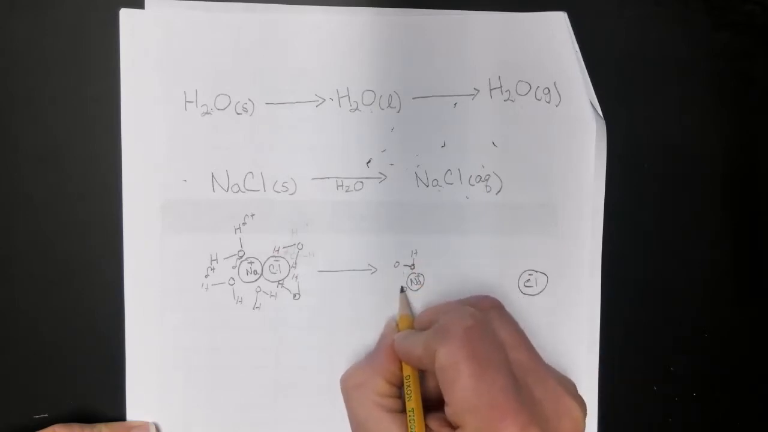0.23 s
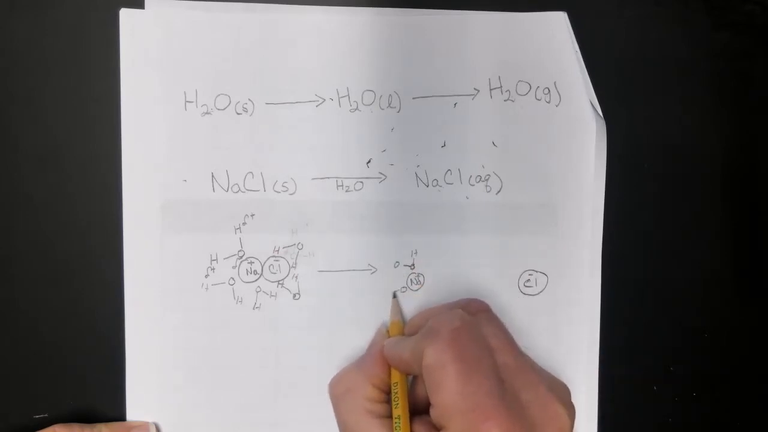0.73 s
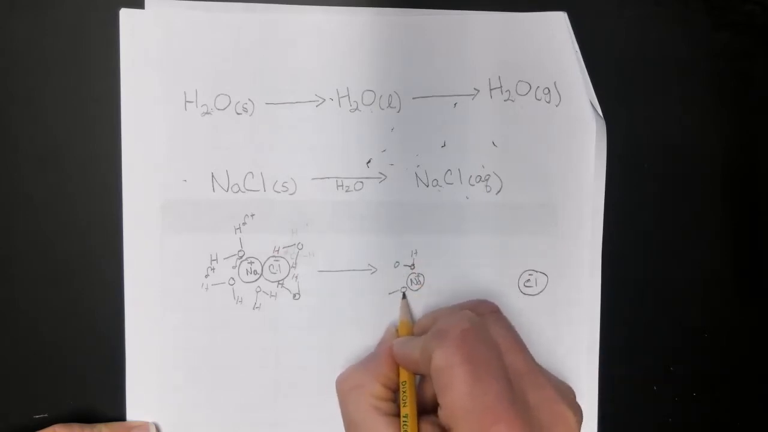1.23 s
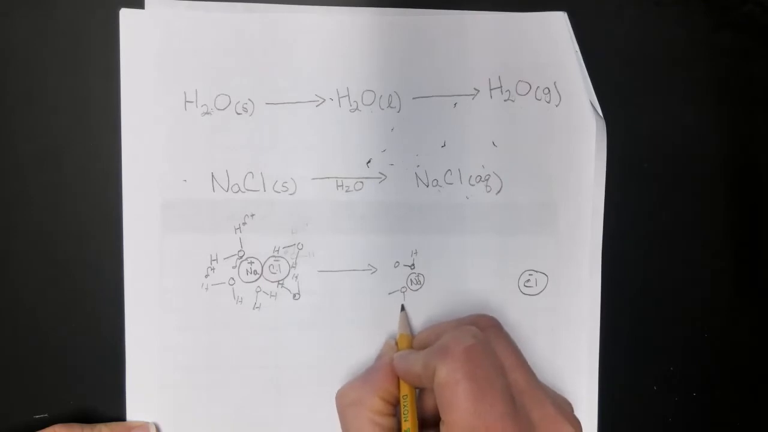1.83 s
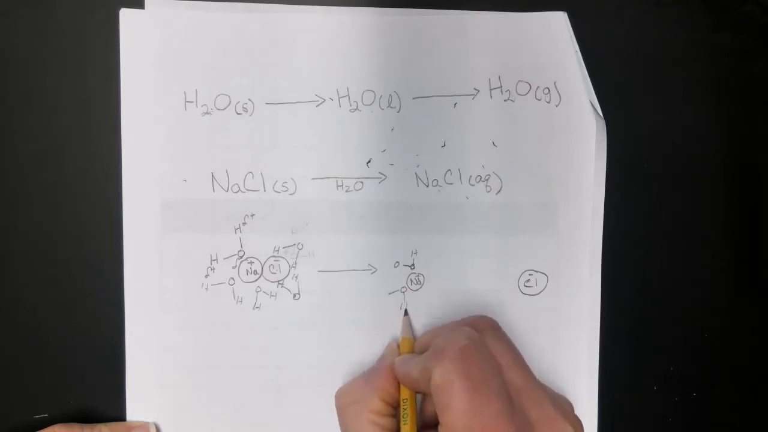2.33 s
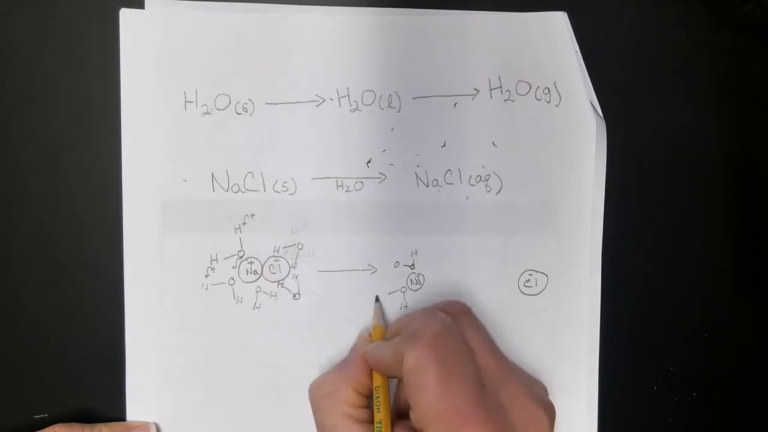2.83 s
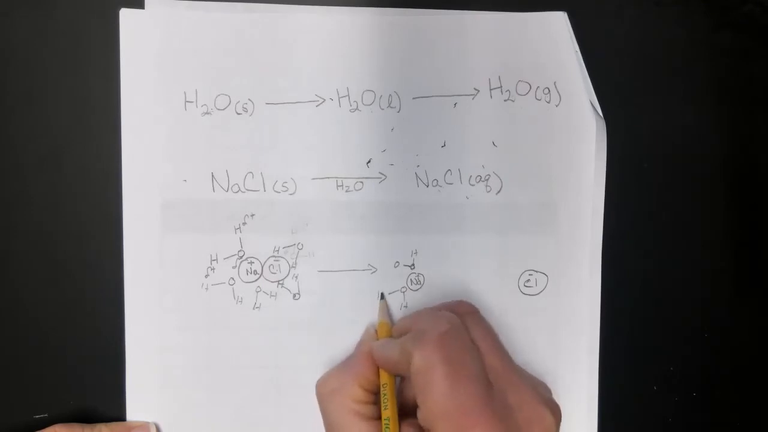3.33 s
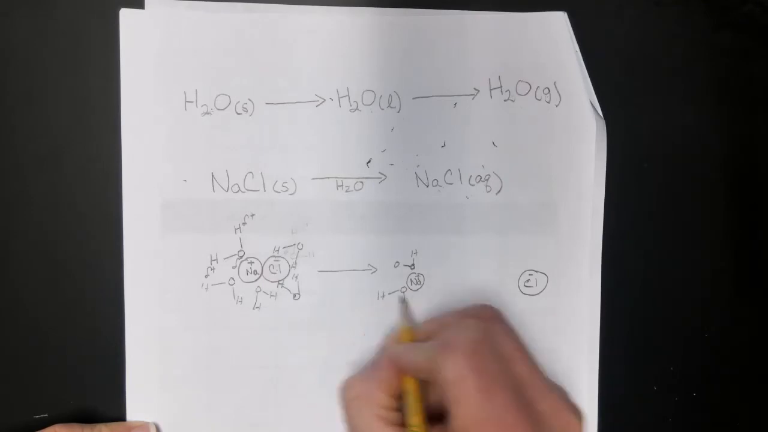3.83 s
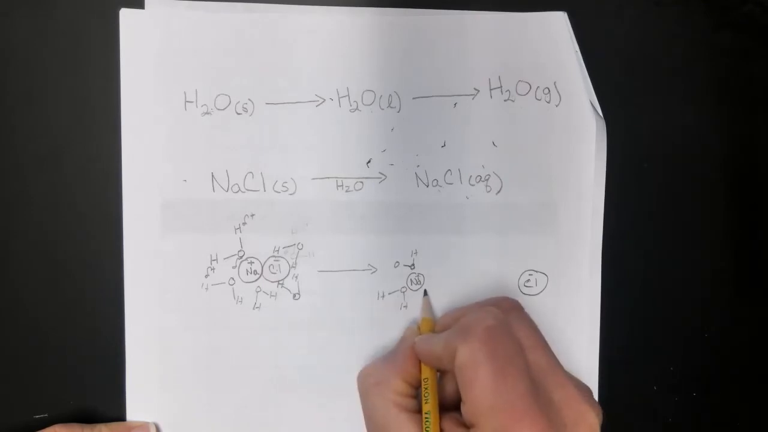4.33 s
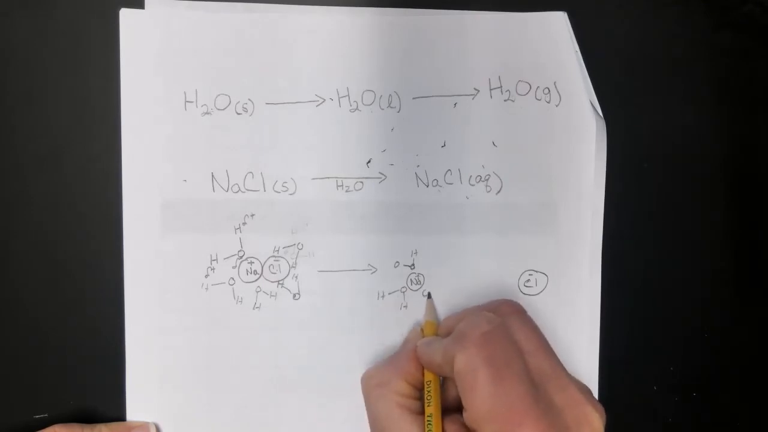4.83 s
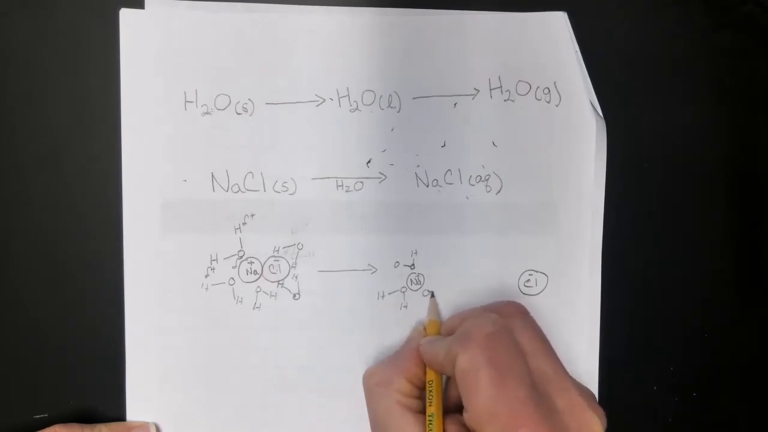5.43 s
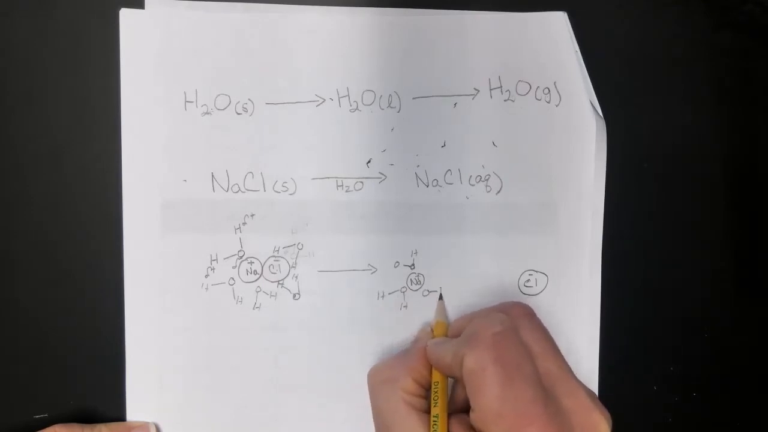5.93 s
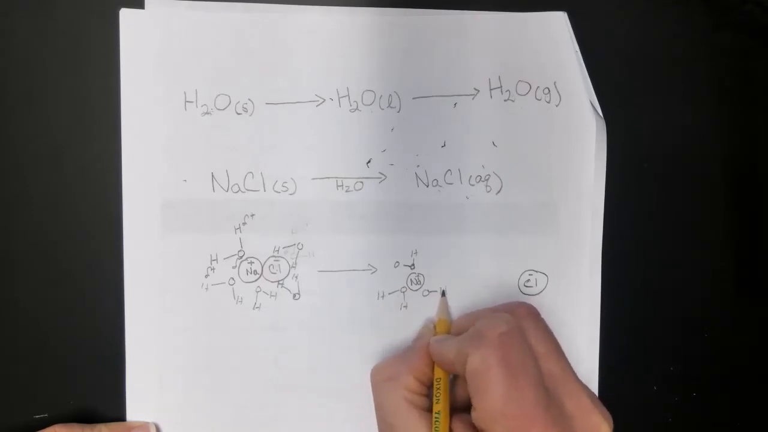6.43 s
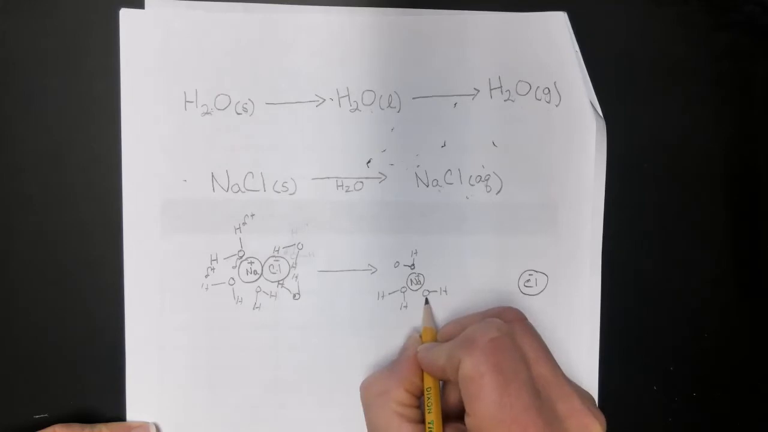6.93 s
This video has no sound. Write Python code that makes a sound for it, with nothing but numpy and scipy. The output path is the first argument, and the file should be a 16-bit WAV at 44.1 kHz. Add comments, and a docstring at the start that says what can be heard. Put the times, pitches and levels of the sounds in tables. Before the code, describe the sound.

Faint, close pencil writing on a sheet of paper, with light taps and soft hand swishes in a quiet, humming room.

```python
"""Pencil on paper, close up

A pencil draws small letters and lines on a sheet lying on a desk, in a quiet room with humming
ventilation. The tip ticks down and catches on paper fibres, which ring the pencil; between letters
the hand slides over the sheet. The desk microphone is narrow-band and adds its own hiss, and the
treble dips briefly now and then."""
import sys
import numpy as np
from scipy import signal
from scipy.fft import rfft, irfft
from scipy.io import wavfile
from scipy.ndimage import uniform_filter1d

SR = 44100
rng = np.random.default_rng(int(sys.argv[2]) if len(sys.argv) > 2 else 0)


def unload_wav(signal):
    """Save mono or channel-first audio to the path in sys.argv[1] as 16-bit WAV at rate SR, clipped to [-1, 1]."""
    wavfile.write(
        sys.argv[1],
        SR,
        np.round(np.clip(np.atleast_2d(signal).T, -1, 1) * 32767).astype(np.int16),
    )


N = 316197
T = np.arange(N) / SR
FREQS = np.maximum(np.fft.rfftfreq(N, 1 / SR), 1)
TOP_HZ = 7270  # upper edge of the microphone's band

# modes of the pencil against the desk: pitch_hz, width_hz, level_db
PENCIL_MODES = [(1380, 470, -4.5), (1920, 330, -2), (2504, 330, 0), (3160, 290, 0.5), (3820, 360, 0.5),
                (4204, 330, 3.5), (5100, 740, -9.5), (5420, 560, 0.5), (6420, 830, 0), (7070, 190, 4.5)]


def pencil_strokes():
    """Fibre slips shake the pencil; some stroke directions ring the tip, others make the shaft rasp."""
    # strokes on the sheet: middle_s, length_s, level_db, ring_db, ring_pitch_hz, rasp_db
    strokes = [(0.037, 0.12, -62.5, -0.5, 5950, -3), (0.197, 0.17, -65.5, -3, 6170, -4.5),
               (0.615, 0.105, -57.7, 0, 6180, 5.5), (0.702, 0.04, -62, 0, 6150, -2),
               (0.792, .074, -68, -9, 6060, -5), (1.155, 0.11, -60.5, 4.5, 6000, -2),
               (1.85, 0.12, -64.5, -1, 6150, -1), (1.94, .04, -72, 3, 6150, -2),
               (2.18, 0.1, -62, 4, 6120, -3.5), (2.426, 0.073, -62, -8, 6100, -2),
               (3.024, 0.12, -61, 5.5, 6080, -2), (3.118, .034, -67, 0, 6100, -3),
               (3.183, .016, -67, 3, 6230, -6), (3.374, 0.12, -62.5, 4, 6080, -4),
               (3.62, 0.095, -61, -7, 6200, 0), (4.456, .098, -70, 4, 6040, -2),
               (4.586, 0.15, -67.5, 4, 5850, -5), (4.674, 0.15, -65, -20, 5900, -4.5),
               (4.783, 0.11, -64, -1, 5900, -2), (4.894, 0.11, -68.5, -4, 6000, 4),
               (5.342, 0.045, -59, -14, 5700, -1), (5.378, .056, -62, -12, 5700, -2),
               (5.803, 0.12, -63, 1, 5920, -1), (6.158, 0.12, -62, 1, 5900, -3),
               (6.423, .06, -60, -4, 5650, -4), (6.988, 0.11, -60.5, 2.5, 5970, -3)]
    tip_width_hz = 620
    slips = fibre_slips(per_second=12000, scatter_db=2.2, patchy_db=1.2)
    shaft = unit(through(slips, resonances(PENCIL_MODES)))
    rasp = through(shaft, band(3600, 4900))  # the modes a firm stroke drives hardest
    catches = fibre_slips(per_second=9000, scatter_db=2.5, patchy_db=1.2)
    out = np.zeros(N)
    for middle, length, level_db, ring_db, pitch_hz, rasp_db in strokes:
        moving = np.abs(T - middle) < length / 2
        tip_band_hz = [pitch_hz - tip_width_hz / 2, pitch_hz + tip_width_hz / 2]
        tip_filter = signal.butter(3, tip_band_hz, "band", fs=SR, output="sos")
        tip = unit(signal.sosfilt(tip_filter, catches[moving]))
        ring = amp(ring_db)
        body = unit(shaft[moving] + (amp(rasp_db) - 1) * rasp[moving])
        speed = gesture(middle, length, rise_share=0.47, power=0.91)[moving]
        out[moving] += amp(level_db) * speed * (body + ring * tip) / np.hypot(1, ring)
    return out


def tip_taps():
    """Each landing is a dry tick of crumbling graphite, only partly coloured by the pencil's modes."""
    # the tip touches down: start_s, relative_force_db
    landings = [(2.0985, -55), (2.372, -49.5), (2.9235, -59.5), (3.179, -62), (3.2705, -51.5),
                (3.5683, -50.5), (3.571, -49), (5.328, -51), (6.066, -59.5), (6.375, -53.5)]
    # tone of the tick: frequency_hz, gain_db
    tick_colour = [(1000, -11.5), (2900, -3), (3950, 6), (5200, -7), (7200, -4)]
    size, decay_s = int(.02 * SR), .0014
    bare_tick_db, body_gain_db = -0.5, 18.5
    pushes = np.zeros(N)
    for start_s, force_db in landings:
        start = int(start_s * SR)
        push = np.exp(-np.arange(size) / SR / decay_s) * rng.standard_normal(size)
        pushes[start:start + size] += amp(force_db) * push / np.linalg.norm(push)
    body = np.hypot(np.abs(resonances(PENCIL_MODES)), amp(bare_tick_db)) * colour(tick_colour)
    return amp(body_gain_db) * through(pushes, body)


def hand_slides():
    """Skin touches many fibres at once: a smoother, broader swish, fuller when it presses harder."""
    # the side of the hand shifts on the sheet: middle_s, length_s, level_db, pressure_boost_db
    slides = [(1.295, 0.19, -60, -1), (2.599, 0.18, -54, 1), (3.742, 0.19, -53.5, 3.5),
              (7.147, 0.18, -58.5, 0.5)]
    # tone of skin rubbing on paper: frequency_hz, gain_db
    skin_colour = [(600, -10), (1400, -13), (1950, -6.5), (2700, -10), (3100, -8.5), (3400, -7), (4100, -5),
                   (4450, -11.5), (5150, -5.5), (5450, -7), (5900, 1), (6250, -2), (6600, 2.5), (7200, -2)]
    slips = fibre_slips(per_second=25000, scatter_db=1.5, patchy_db=.8)
    rub = unit(through(slips, colour(skin_colour) * (FREQS < TOP_HZ)))
    pressed = through(rub, band(3400, 5700))  # the part that grows with pressure
    out = np.zeros(N)
    for middle, length, level_db, boost_db in slides:
        speed = gesture(middle, length, rise_share=0.55, power=1.09)
        out += amp(level_db) * speed * (rub + (amp(boost_db) - 1) * pressed)
    return out


def room_tone():
    """Steady ventilation air hums in the narrow resonances of duct and room, with mic hiss on top."""
    # ventilation rumble running out into microphone hiss: frequency_hz, density_db_per_hz
    air = [(4, -59.5), (14, -56.5), (30, -59.5), (48, -71), (75, -75), (140, -75), (195, -80), (270, -77.5),
           (305, -83), (650, -90), (820, -94), (1000, -98.5), (1500, -104), (3200, -107.4), (7200, -106.6)]
    # room and duct resonances: pitch_hz, width_hz, density_db_per_hz
    hum_modes = [(64.2, 10, -66.5), (81.5, 13, -71), (103, 24, -72), (123.5, 12, -67), (143.2, 12, -64),
                 (159.9, 8.2, -68), (180.8, 8.9, -72.5), (212, 7, -68), (225, 7.9, -72.5),
                 (248.6, 7.1, -74), (322, 6.1, -81.5), (338.6, 15, -81.5), (408.3, 11, -80.5),
                 (425, 13, -80.5), (463, 24, -88), (505, 3.4, -85.5)]
    hum_power = sum(amp(db) ** 2 / (1 + ((FREQS - hz) / width) ** 2 * 2) ** 2
                    for hz, width, db in hum_modes)
    # higher up the room's modes crowd into a fine ripple that fades under the hiss
    ripple_db = np.interp(FREQS, [300, 550, 1000, 2000], [0, 1.6, 1.3, .6])
    ripple_shape = unit(uniform_filter1d(rng.standard_normal(len(FREQS)), size=80))
    air_power = (colour(air) * amp(ripple_db * ripple_shape)) ** 2
    density = np.sqrt(air_power + hum_power)
    return through(rng.standard_normal(N), density * np.sqrt(SR / 2))


def fibre_slips(per_second, scatter_db, patchy_db):
    """Tiny slips over paper fibres, unequal in size and bunched in rough patches."""
    slips = (rng.random(N) < per_second / SR) * rng.standard_normal(N)
    sizes = amp(scatter_db * rng.standard_normal(N))
    patches = amp(patchy_db * wander(rate_hz=110))
    return unit(slips * sizes * patches)


def gesture(middle, length, rise_share, power):
    """An arch that rises from zero to one over rise_share of its length, then falls back."""
    progress = (T - middle) / length + .5
    angle = np.interp(progress, [0, rise_share, 1], [0, np.pi / 2, np.pi])
    return np.maximum(np.sin(angle), 0) ** power


def wander(rate_hz):
    """Smooth random drift with an rms of one."""
    size = int(SR / rate_hz)
    steps = np.repeat(rng.standard_normal(N // size + 1), size)
    return unit(uniform_filter1d(steps, size)[:N])


def resonances(modes):
    """Causal response of steep-sided resonances whose powers add up."""
    power = sum(amp(db) ** 2 / (1 + ((FREQS ** 2 - hz ** 2) / (FREQS * width)) ** 2) ** 2
                for hz, width, db in modes)
    cepstrum = irfft(np.log(power), N)
    return np.exp(rfft(cepstrum * (np.arange(N) < N // 2)) - cepstrum[0] / 2)


def colour(points):
    """Gain per frequency through (Hz, dB) points."""
    hz, db = np.transpose(points)
    return amp(np.interp(np.log(FREQS), np.log(hz), db))


def band(low_hz, high_hz):
    """Gain per frequency of a steep band-pass."""
    return 1 / (1 + (low_hz / FREQS) ** 16) / (1 + (FREQS / high_hz) ** 40)


def through(x, response):
    """Filter by a frequency response."""
    return irfft(rfft(x) * response, N)


def amp(db):
    """Decibels to gain."""
    return 10 ** (np.asarray(db) / 20)


def unit(x):
    """Scale to an rms of one."""
    return x / np.sqrt(np.mean(x ** 2))


def scene():
    """Writing close to the desk microphone, in mono, with the room behind it."""
    return (pencil_strokes() + tip_taps() + hand_slides() + room_tone())[None]


def record(dry):
    """The treble dips now and then; the converter passes a narrow band, sits off zero and adds hiss."""
    # brief dips in the treble: middle_s, length_s, depth_db
    dips = [(0.134, 0.015, -7), (0.242, .018, -3), (0.834, 0.025, -5), (0.897, .022, -18),
            (1.303, .016, -5), (1.516, 0.024, -8), (1.622, 0.023, -14), (2.179, 0.016, -16),
            (2.24, .022, -6), (2.35, 0.017, -11), (2.987, .022, -13), (3.80, 0.02, -8), (4.397, 0.025, -13),
            (4.909, 0.017, -11), (5.227, .02, -9), (5.762, 0.02, -5), (6.148, 0.014, -9),
            (6.316, 0.018, -12)]
    hiss_db, converter_top_hz, dc_offset = -94.5, 15700, -.0102
    dip_db = sum(db * gesture(middle, length, rise_share=0.37, power=0.26) for middle, length, db in dips)
    treble = through(dry, band(1050, 5900))
    dipped = dry + (amp(dip_db) - 1) * treble
    narrow = signal.sosfilt(signal.ellip(12, .2, 70, TOP_HZ, fs=SR, output="sos"), dipped)
    hiss = amp(hiss_db) * rng.standard_normal(N)
    converter_lowpass = signal.ellip(8, .2, 70, converter_top_hz, fs=SR, output="sos")
    return dc_offset + signal.sosfilt(converter_lowpass, narrow + hiss)


dry = scene()
out = record(dry)
unload_wav(out)
```